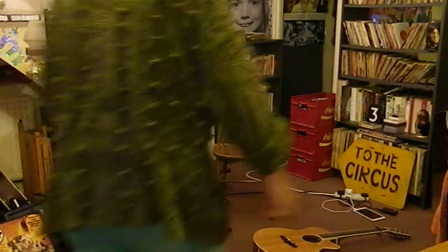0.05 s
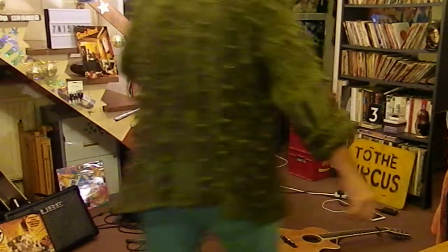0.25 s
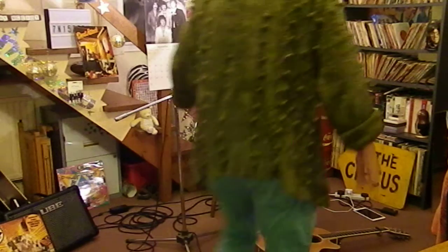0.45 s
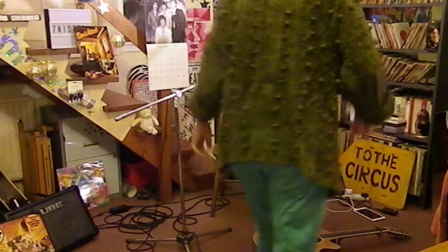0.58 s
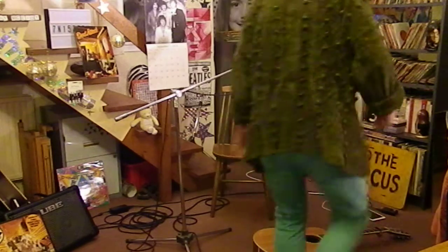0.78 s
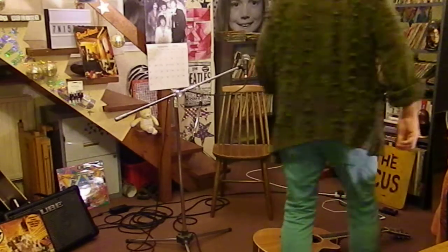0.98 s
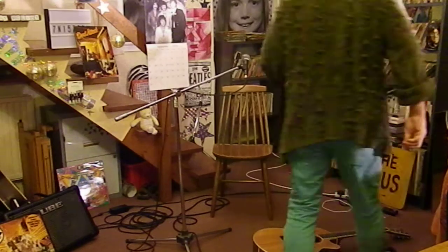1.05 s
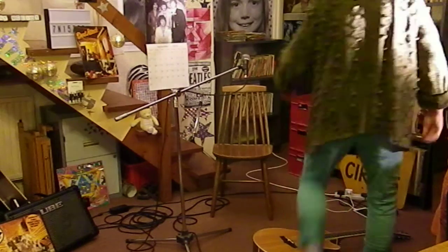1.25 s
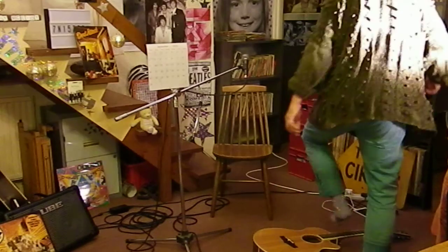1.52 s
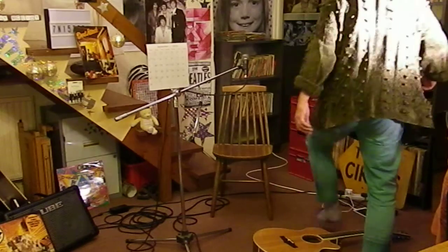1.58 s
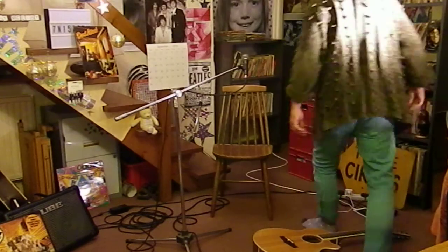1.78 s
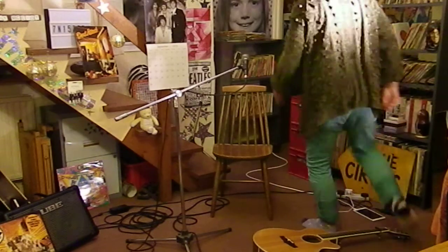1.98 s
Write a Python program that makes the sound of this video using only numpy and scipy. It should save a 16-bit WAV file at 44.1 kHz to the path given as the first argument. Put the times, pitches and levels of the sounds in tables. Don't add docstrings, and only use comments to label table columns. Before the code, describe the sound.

Padded footsteps in socks on a carpeted wooden floor: deep, soft thuds at about 0.2-0.3, 0.65, 1.1 and a firmer double one at 1.7 seconds. Boards knock dully and sock fibres scuff lightly. Clothes swish throughout, strongest around 1.4. A tiny bright tick comes near 1.98. Small, dry room; simple camera microphone with constant hiss, low rumble and a very faint high whine.

```python
import sys
import numpy as np
from scipy import signal
from scipy.fft import rfft, irfft
from scipy.io import wavfile
from scipy.ndimage import uniform_filter1d

SR = 44100
rng = np.random.default_rng(int(sys.argv[2]) if len(sys.argv) > 2 else 0)


def store_wav(level_fs):
    pcm = np.round(np.clip(np.atleast_2d(level_fs), -1, 1) * 32767)
    wavfile.write(sys.argv[1], SR, pcm.T.astype(np.int16))


def ratio(d):
    e = np.asarray(d, float) / 20
    return 10 ** e


N = 90404
TIME_S = np.arange(N) / SR


def coloured(x, points):
    point_hz, point_db = np.array(points).T
    hz = np.fft.rfftfreq(N, 1 / SR) + 1
    gain_db = np.interp(np.log(hz), np.log(point_hz), point_db)
    y = irfft(rfft(x) * ratio(gain_db), N)
    return y / y.std()


def walk(rate_hz):
    window = int(SR / rate_hz)
    drift = uniform_filter1d(uniform_filter1d(rng.standard_normal(N), window), window)
    return drift / drift.std()


def fibres(grain_db):
    grain = np.repeat(rng.exponential(size=N // 8 + 1), 8)[:N]
    x = rng.standard_normal(N) * ratio(grain_db * grain)
    return x / x.std()


def band(x, hz, width_hz):
    b, a = signal.iirpeak(min(hz, .45 * SR), hz / width_hz, fs=SR)
    return signal.lfilter(b, a, signal.lfilter(b, a, x))


def swell(start_s, peak_s):
    u = np.maximum(TIME_S - start_s, 0) / peak_s
    return u ** 2 * np.exp(2 * (1 - u))


def rubs(rows, q, grain_db=1.5):
    out = np.zeros(N)
    for start_s, peak_s, level_db, hz in rows:
        shape = swell(start_s, peak_s)
        burst = shape * band(fibres(grain_db), hz, hz / q)
        out += ratio(level_db) * burst * np.sqrt(np.sum(shape ** 2) / np.sum(burst ** 2))
    return out


# frequency in Hz, density in dB per Hz.
HISS_COLOUR = [(20, 9), (45, -3.5), (90, 1.5), (210, -1.5), (900, -9.5), (4000, -16.5), (10300, -14.5),
               (15800, -21.5)]


def hiss():
    level_db = -49.5 + .5 * walk(8)
    noise = ratio(level_db) * coloured(rng.standard_normal(N), HISS_COLOUR)
    whine = ratio(-72) * np.sin(2 * np.pi * 10952 * TIME_S)
    return noise + whine


# time in seconds, level in dB.
SWISH_LEVEL = [(0, -52), (.05, -56), (.2, -60), (.26, -51.5), (.45, -58.5), (.6, -55.5), (.65, -54.5),
               (.8, -58), (.92, -80), (1.1, -59.5), (1.25, -52.5), (1.36, -47.5), (1.48, -48.5),
               (1.6, -55.5), (1.7, -58), (1.9, -57.5), (2.05, -64)]
# frequency in Hz, density in dB per Hz.
CLOTH_COLOUR = [(300, -43), (1000, -5.5), (3000, -2.5), (6500, -2), (10000, 0), (13000, -4.5), (15500, -14)]


def clothes():
    time_s, db = np.array(SWISH_LEVEL).T
    level_db = np.interp(TIME_S, time_s, db) + 0.58 * walk(9.1)
    return ratio(level_db) * coloured(fibres(1.35), CLOTH_COLOUR)


# start in seconds, peak in dB, pitch in Hz, time to peak in seconds.
JOIST_SWINGS = [(.002, -39.5, 24, 0.031), (.09, -44, 25, .03), (0.179, -24, 34.7, 0.043),
                (0.292, -23.5, 36.6, 0.021), (0.321, -34, 26.5, 0.08), (.62, -23, 39.24, 0.053),
                (0.829, -45, 31, 0.026), (1.057, -35, 29.5, 0.024), (1.07, -27, 43.34, 0.035),
                (1.138, -26.5, 44.1, 0.026), (1.184, -39.5, 31.1, 0.062), (1.32, -45.5, 31, 0.042),
                (1.5, -52, 29.5, 0.026), (1.682, -25, 45.2, 0.022), (1.749, -24, 45.4, 0.013),
                (1.771, -33.5, 39.8, .025), (1.83, -35, 28.4, 0.032)]


def joists():
    sag_per_s, overtone_db = 0.79, -18
    out = np.zeros(N)
    for start_s, peak_db, hz, peak_s in JOIST_SWINGS:
        since_s = np.maximum(TIME_S - start_s, 0)
        phase = 2 * np.pi * hz * np.log1p(sag_per_s * since_s) / sag_per_s
        swing = np.sin(phase) - ratio(overtone_db) * np.cos(2 * phase)
        out += ratio(peak_db) * swell(start_s, peak_s) * swing
    return out


# start in seconds, time to peak in seconds, level in dB rms, centre in Hz.
BOARD_KNOCKS = [(.21, 0.063, -45.5, 105), (.266, 0.0064, -48, 278), (.312, 0.011, -43, 121),
                (.38, 0.01, -54.5, 385), (.42, 0.13, -55, 99), (.63, 0.029, -41.5, 86),
                (.678, 0.031, -49.5, 325), (.65, 0.043, -51, 790), (.755, .016, -51.5, 124),
                (1.08, 0.016, -48.5, 330), (1.16, 0.047, -58.5, 796), (1.085, 0.038, -51.5, 148),
                (1.19, 0.034, -54.5, 120), (1.24, 0.031, -53.5, 580), (1.688, 0.019, -41, 402),
                (1.69, .02, -41.5, 120), (1.735, 0.014, -41, 129), (1.778, .012, -47, 140),
                (1.79, 0.013, -61, 302), (1.86, 0.046, -60, 102), (1.98, 0.0096, -78, 277)]


def knocks():
    return rubs(BOARD_KNOCKS, q=1.02)


# start in seconds, time to peak in seconds, level in dB rms, centre in Hz.
SOCK_SCUFFS = [
    (.485, .02, -52.5, 3000),
    (.53, 0.012, -51.5, 5600),
    (.662, .01, -46, 6100),
    (.668, 0.016, -53, 1960),
    (.99, .008, -57, 6100),
    (1.13, 0.055, -59.5, 1820),
    (1.69, 0.0062, -45.5, 1830),
    (1.692, 0.0039, -49, 4570),
    (1.81, 0.0049, -46, 5900),
    (.72, 0.035, -62, 1980),
]


def scuffs():
    return rubs(SOCK_SCUFFS, q=0.51)


def tick():
    start_s, peak_db, hz, width_hz = 1.9752, -23, 10200, 3700
    x = np.zeros(N)
    x[int(start_s * SR)] = 1
    x = band(band(x, hz, width_hz), hz, width_hz)
    return ratio(peak_db) * x / abs(x).max()


def room(x):
    t60_s, gap_s, level_db = .12, .002, -1
    t = np.arange(int(.3 * SR)) / SR
    echoes = rng.standard_normal(len(t)) * (rng.random(len(t)) < .05 + 3 * t)
    tail = echoes * ratio(-60 * t / t60_s) * (t > gap_s)
    tail /= np.sqrt(np.sum(tail ** 2))
    return x + ratio(level_db) * signal.fftconvolve(x, tail)[:N]


def scene():
    mono = hiss() + clothes() + joists() + knocks() + room(scuffs() + tick())
    return np.array([mono, mono])


# centre in Hz, width in Hz, gain in dB.
TREBLE_DIPS = [
    (11820, 250, -9.5),
    (15100, 300, -6),
]


def shape_treble(x):
    f = np.fft.rfftfreq(N, 1 / SR)
    gain_db = sum(db * np.exp(-((f - hz) / width_hz) ** 2) for hz, width_hz, db in TREBLE_DIPS)
    return irfft(rfft(x) * ratio(gain_db) * (f < 15740), N)


# time in seconds, centre in Hz, width in Hz.
STEREO_SLIPS = [(.08, 12100, 2300), (.196, 9000, 1500), (.196, 12400, 2800), (.382, 6900, 1400),
                (.637, 9000, 1500), (.637, 12700, 3600), (.73, 14500, 1500), (.87, 12400, 1500),
                (.87, 14500, 1500), (.893, 15100, 1400), (1.171, 8600, 2300), (1.171, 13100, 1500),
                (1.171, 15100, 1400), (1.404, 6300, 1400), (1.404, 10300, 1600), (1.404, 15100, 1400),
                (1.45, 13100, 1500), (1.45, 15100, 1400), (1.775, 4900, 1700)]


def stereo_slips(left):
    slip_s, lag_s, fade_s = .023, .05, .004
    f, spectrum = np.fft.rfftfreq(N, 1 / SR), rfft(left)
    right = left.copy()
    for centre_s, hz, width_hz in STEREO_SLIPS:
        part = irfft(spectrum * (abs(f - hz) < width_hz / 2), N)
        gate = np.clip((slip_s / 2 - abs(TIME_S - centre_s)) / fade_s + .5, 0, 1)
        right += gate * (np.roll(part, int(lag_s * SR)) - part)
    return np.array([left, right])


def low_pass(x):
    return signal.sosfilt(signal.butter(12, 15830, fs=SR, output="sos"), x)


def record(dry):
    mix = stereo_slips(shape_treble(dry[0]))
    return low_pass(mix)


dry = scene()
out = record(dry)
store_wav(out)
```